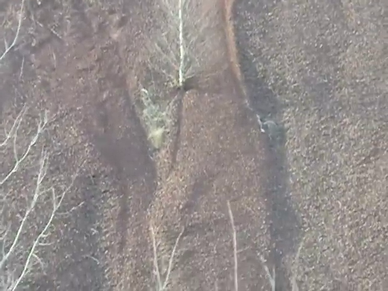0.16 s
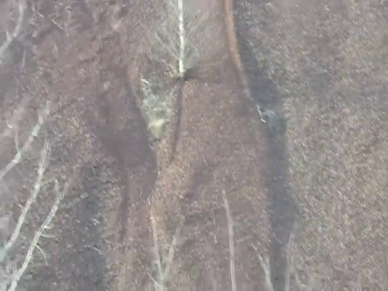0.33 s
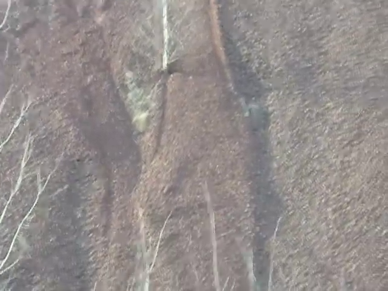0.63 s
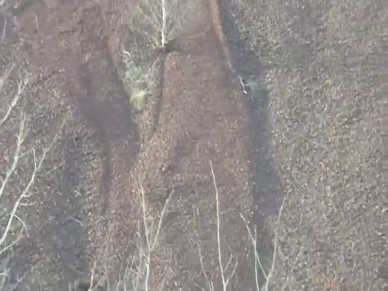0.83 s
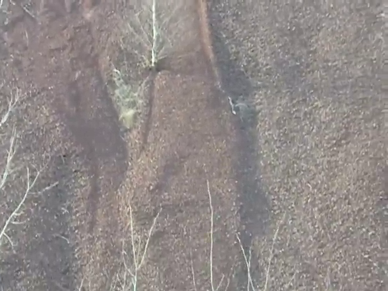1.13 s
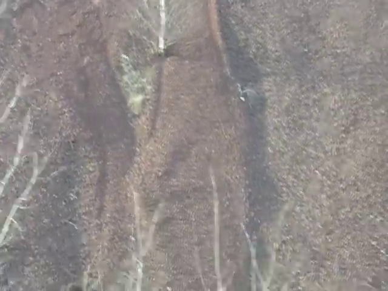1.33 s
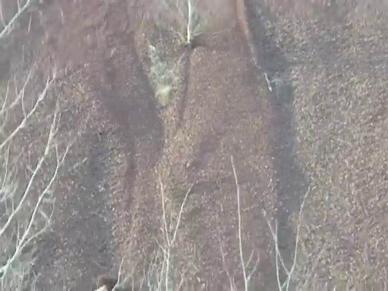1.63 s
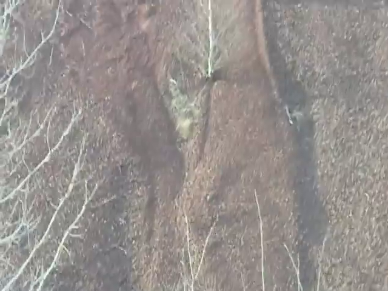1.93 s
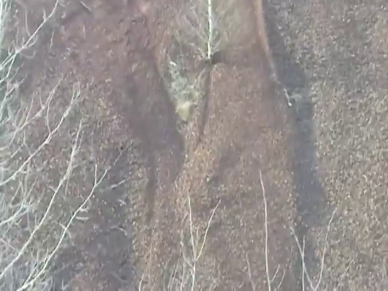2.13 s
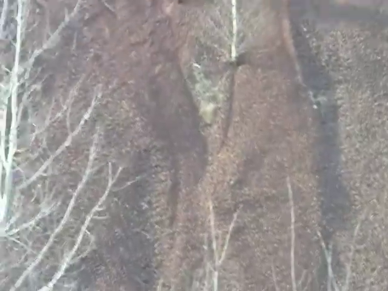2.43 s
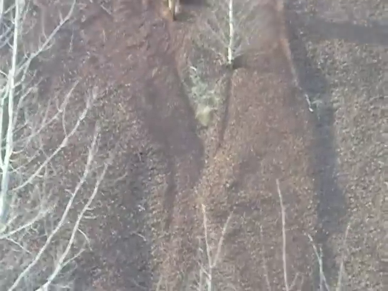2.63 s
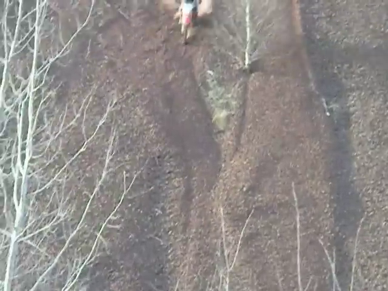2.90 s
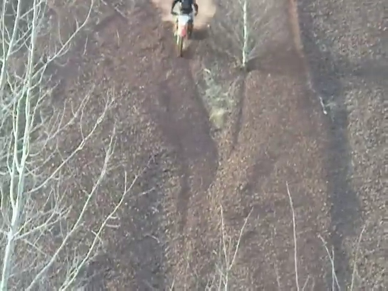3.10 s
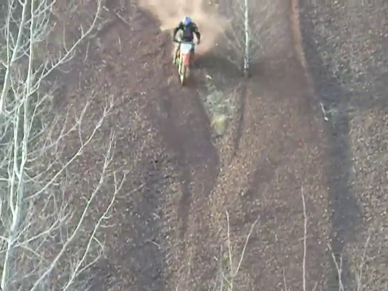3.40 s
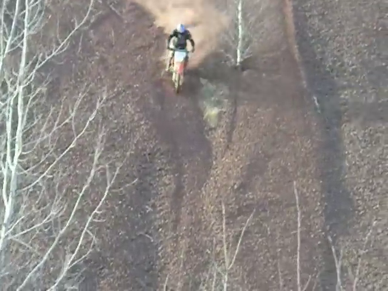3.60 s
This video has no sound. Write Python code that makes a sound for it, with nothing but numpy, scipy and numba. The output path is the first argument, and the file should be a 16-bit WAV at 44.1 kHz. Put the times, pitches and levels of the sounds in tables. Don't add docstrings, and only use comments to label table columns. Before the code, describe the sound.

A two-stroke dirt bike sputters down a wooded slope, nears, revs briefly, then drops to a rough idle.

```python
import sys
import numpy as np
from scipy import signal
from scipy.io import wavfile
from scipy.ndimage import uniform_filter1d
from numba import njit

SR = 44100
rng = np.random.default_rng(int(sys.argv[2]) if len(sys.argv) > 2 else 0)


def master_out(mix):
    frames = np.transpose(np.atleast_2d(mix))
    ceiling = np.clip(frames, -1, 1)
    pcm = np.round(ceiling * 32767).astype(np.int16)
    wavfile.write(sys.argv[1], SR, pcm)


def boost(x):
    u = np.asarray(x, float) / 20
    return 10 ** u


N = 165375

# time in seconds, level in dB, length in ms (negative = push, not suction).
WIND_THUMPS = [(0.502, 10.5, 3.5), (0.584, -18, -2), (0.591, 7, -1), (1.006, 2.5, 1.5), (1.103, -1.5, -4),
               (1.223, 5, 3.5), (1.344, -24, -1), (1.391, 2, 1.73), (1.521, -4, 2), (1.595, -0.5, 0),
               (1.797, -5.5, 5), (2.906, -8, 17), (3.151, 6.5, 1.5)]
# time in seconds, level in dB, length in ms (negative = push).
WIND_SLAPS = [
    (.8129, 6, .7),
    (.8137, 14, -.7),
    (.818, 10, 1.4),
    (.8192, 21, -.8),
    (.833, 14, 1.2),
]
# time in seconds, level in dB, length in ms (negative = push).
WIND_KNOCKS = [(.033, -5, 1.6), (.066, -3, -1.2), (.073, -2, -1.4), (.120, 0, 2.6), (.181, 1, 1.8),
               (.262, -3, 2), (.391, -3, -1.3), (.403, -2, -1), (.604, 0, 1.8)]
# time in seconds, level in dB.
GUSTS = [(0.0, -30.5), (0.48, -29), (0.51, -16), (0.55, -24), (0.58, -14.5), (0.62, -26.5), (2.02, -31),
         (2.69, -41), (2.87, -21), (3.08, -57), (3.14, -26), (3.24, -42.5), (3.65, -26.5), (3.75, -35.5)]
# time in seconds, peak in dB, crack over the pipe in dB.
FAR_BANGS = [(0.067, -13, -3.5), (0.298, -5, -5), (0.429, -0.5, -3), (0.652, 0.5, -5), (0.74, -5, -6),
             (0.752, -11, -17), (0.8115, -2.5, -31), (0.896, 3, -4), (0.952, -7.5, 4.5), (1.041, -1, -22),
             (1.095, -33, -5), (1.141, -0.5, -2.5), (1.203, -22, -14), (1.305, -16, -3), (1.353, -2, -2.5),
             (1.441, -10, 0.5), (1.561, -13, 2.5), (1.573, -0.5, -10), (1.63, -19, -3),
             (1.697, -18.5, 13.5), (1.73, -6, -5), (1.837, -4, -7.5), (1.952, -10, 0), (1.998, -0.5, -19),
             (2.022, -2.5, -4), (2.041, -10.5, 0)]
# time in seconds, peak in dB, crack over the pipe in dB.
NEAR_BANGS = [(2.155, -18, 2), (2.170, 5.5, 0), (2.186, -1.5, 1), (2.218, 8.5, 0), (2.231, -12, 15.5),
              (2.261, 11, -1), (2.275, 10.5, -1), (2.355, 7.5, 1.5), (2.409, 1, -4), (2.422, 9.5, 0),
              (2.461, 8, 2.5), (2.473, 7.5, 8.5), (2.522, 8, 2), (2.532, 5, 10), (2.592, -16.5, -3),
              (2.605, 10.5, 2), (2.616, 7, 7), (2.661, -12, 10.5), (2.729, -14.5, -2), (2.749, -14, 3),
              (2.760, -9, -9.5), (2.774, 10, 1.5), (2.918, 5.5, 3), (2.990, 3.5, 1), (3.008, 1.5, 1.5),
              (3.057, -8, 1.5)]
# time in seconds, peak in dB, crack over the pipe in dB.
IDLE_BANGS = [(3.102, 7.5, 3), (3.121, -9, 8), (3.203, 8, 3.5), (3.283, 6, -1.5), (3.33, 2.5, 1),
              (3.374, -0.5, -4), (3.399, -3, -17), (3.417, 3, -5), (3.441, -19, -8), (3.484, 3, -1.5),
              (3.523, -1.5, -1.5), (3.545, -1.5, -10.5), (3.585, 5.5, -0.5), (3.607, -5, -6),
              (3.629, -8.5, -4), (3.644, 7.5, -3), (3.664, 2, -0.5), (3.703, -8, -10), (3.723, -8.5, -7)]
# time in seconds, turns per second, puff in dB, rattle in dB.
CRANK = [(0, 42, -17.5, -31.5), (0.398, 50.5, -17, -27), (.8, 53, -42, -21), (1.201, 57, -28.5, -32),
         (1.499, 53, -37, -29), (1.901, 44.6, -42, -36.5), (2.05, 50, -19, -27), (2.18, 46, -31, -26),
         (2.251, 73, 0, -12.5), (2.407, 99, -29.5, -16), (2.5, 69, -24.5, -12), (2.642, 83, -13.5, -13),
         (2.801, 68, -8, -16), (2.898, 57, -7.5, -20), (3.029, 52, -13.5, -17.5), (3.298, 60, -15, -20),
         (3.75, 58, -15.5, -24)]
# time in seconds, level in dB.
STEADY_FIRING = [
    (2.05, -30),
    (2.25, -14),
    (2.6, -13),
    (2.8, -12),
    (2.95, -17),
    (3.75, -19),
]
# frequency in Hz, width in Hz, level in dB.
PUFF_MODES = [(385, 120, 0), (600, 170, -2), (850, 400, -7), (1100, 250, -8)]
# frequency in Hz, width in Hz, level in dB.
PIPE_MODES = [(361.8, 40.4, 11), (604, 110, -13), (790, 585, -10.5), (984, 67, -0.5), (1090, 65, -7),
              (1700, 90, -17.5), (2130, 69, -10)]
# frequency in Hz, width in Hz, level in dB.
CRACK_MODES = [(1572, 760, 4.5), (1778, 104, 11), (2288, 310, 0), (2825, 246, 0), (3592, 290, -9.5)]
# frequency in Hz, width in Hz, rms in dB.
TIN_FAR = [(403, 160, -15), (780, 370, -6), (1149, 220, -0.5), (1336, 55, -1.5), (1780, 160, -5),
           (2320, 360, -3.5), (3030, 130, -4), (3630, 230, -13.5)]
# frequency in Hz, width in Hz, rms in dB.
TIN_NEAR = [(619, 34, -9.5), (935, 100, -2.5), (1080, 100, -4.5), (1407, 260, -0.5), (1730, 270, -4),
            (2070, 110, -10), (2500, 460, -4.5), (3063, 420, -1.5), (3430, 650, -17)]
# frequency in Hz, width in Hz, rms in dB.
TIN_IDLE = [(372, 56, 1.5), (481, 180, -17), (933, 40, -5), (1081, 180, -6.5), (1428, 340, -7.5),
            (1660, 220, -6.5), (2135, 150, -2.5), (2540, 730, -7), (3057, 270, -4), (3460, 280, -15)]
# time in seconds, frequency in Hz, rms in dB.
PIPE_HUM = [(2.0, 375, -33), (2.102, 375, -26.5), (2.348, 385, -23.5), (2.548, 415, -28.5),
            (2.682, 400, -31), (2.76, 365, -14), (2.87, 415, -23.5), (3.0, 375, -27), (3.299, 362, -33.5),
            (3.75, 372, -28)]
# time in seconds, frequency in Hz, rms in dB.
CHAIN_WHINE = [
    (2.2, 585, -45),
    (2.249, 595, -15),
    (2.45, 616, -24),
    (2.62, 630, -31),
    (2.72, 594, -21),
    (2.8, 570, -28.5),
    (2.86, 540, -45),
]
# time in seconds, frequency in Hz, rms in dB.
GEAR_WHINE = [
    (2.9, 1086, -47),
    (3.05, 1080, -18),
    (3.301, 1049, -26),
    (3.498, 1056, -25),
    (3.75, 1105, -25.5),
]

IN_SIGHT_S, IDLE_S, TURN_S = 2.187, 2.95, 0.22
BUFFETS_PER_S, BUFFET_SCATTER_DB, BUFFET_HZ, BUFFET_WIDTH_HZ = 68, 7.5, 183.0, 193.0
BUFFET_DB, RUMBLE_DB, CALM_RUMBLE_DB = 6, 8.5, -29.5
TURN_JITTER, PUFF_SCATTER_DB, PUFF_CRACK_DB, BANG_DB = .008, 5, -8, 3
COOL_TURNS, HOT_TURNS, HOT_RISE = 66, 84, 1.1
PUSH_S, PIPE_LOW_HZ = .00015, 227
CRACK_S, CRACK_FAR_S, CRACK_LATE_S, CRACK_DB = .003, .005, .0015, -7.5
SHOCK_HZ, SHOCK_WIDTH_HZ, SHOCK_DB, SHOCK_FAR_DB = 1200, 1600, 1, -4
GATE_TURNS, GATE_FLOOR, PANEL_FLICKER_DB = 0.4, 0.92, 2
WHINE_WOBBLE, WHINE_FLICKER_DB = 0.00809, 4.5
WOOD_T60_S, WOOD_DB, WOOD_GAP_S = .12, -15, .005
AGC_TOP_DB, AGC_SLOPE, AGC_ATTACK_S, AGC_RELEASE_S, AGC_LAG_S = -15, 0.9, 0.00089, 0.035, .0004
OUT_DB, MIC_LOW_HZ, DROOP_HZ, TOP_HZ = 2.5, 162, 3900, 4400
PREAMP_TOP, CLIP, DC = .84, .7, -.0027


def level(x, db):
    return x * boost(db) / np.sqrt(np.mean(x ** 2))


@njit
def svf(x, hz, width):
    y, b, l = np.empty(len(x)), 0., 0.
    g, k = np.tan(np.pi * hz / SR), width / hz
    for i in range(len(x)):
        v = (b + g * (x[i] - l)) / (1 + g * (g + k))
        b, l, y[i] = 2 * v - b, l + 2 * g * v, k * v
    return y


def body(x, modes):
    def ring(v):
        return sum((-1) ** k * boost(db) * svf(v, 1. * hz, 1. * w) for k, (hz, w, db) in enumerate(modes))
    return ring(x + 1e-18) / np.abs(ring(signal.unit_impulse(999))).max()


def clicks(s, db):
    return np.bincount(np.clip((s * SR).astype(int), 0, N - 1), boost(db), N)


def walk(rate):
    k = int(SR / rate)
    held = np.repeat(rng.standard_normal(N // 20)[:N // k + 1], k)[:N]
    return 1.22 * uniform_filter1d(uniform_filter1d(held, k), k)


def ease_in(t, s):
    return 1 / (1 + np.exp(-4 * (t - s) / TURN_S))


def wind(t):
    thumps = np.zeros(N)
    for s, db, ms in WIND_THUMPS + WIND_SLAPS + WIND_KNOCKS:
        thumps -= np.sign(ms) * boost(db) * np.exp(-((t - s) * 2000 / ms) ** 2)
    hits = (rng.random(N) < BUFFETS_PER_S / SR) * np.sign(rng.standard_normal(N))
    hits = hits * boost(BUFFET_SCATTER_DB * np.minimum(rng.exponential(size=N), 3))
    buffets = svf(svf(hits, BUFFET_HZ, BUFFET_WIDTH_HZ), BUFFET_HZ, 2 * BUFFET_WIDTH_HZ)
    rumble = svf(rng.standard_normal(N), 43.0, 80.0) * boost(3.3 * walk(11))
    gust = boost(np.interp(t, *np.array(GUSTS).T))
    gusty = gust * (level(buffets, BUFFET_DB) + level(rumble, RUMBLE_DB))
    return thumps + gusty + level(rumble, CALM_RUMBLE_DB)


def crank_turns(t, speed, bang_s):
    turns = np.cumsum(speed) / SR
    at = np.interp(bang_s, t, turns)
    whole = at[0] + np.r_[0, np.cumsum(np.maximum(np.round(np.diff(at)), 1))]
    return turns + np.interp(t, bang_s, whole - at) - at[0] % 1


def weak_firing(t, turns):
    late, scatter = rng.standard_normal((2, 400))
    puff_s = np.interp(np.arange(400) + TURN_JITTER * late, turns, t, left=t[-1])
    crank_s, _, puff_db, _ = np.array(CRANK).T
    puffs = clicks(puff_s + CRACK_S, np.interp(puff_s, crank_s, puff_db) + PUFF_SCATTER_DB * scatter)
    steady_db = np.interp(puff_s, *np.array(STEADY_FIRING).T, left=-60)
    return puffs, clicks(puff_s + CRACK_S, steady_db + scatter)


def exhaust_pipe(weak, bangs, speed):
    hot = np.clip((speed - COOL_TURNS) / (HOT_TURNS - COOL_TURNS), 0, 1)
    raised = [(hz * HOT_RISE, w, db) for hz, w, db in PIPE_MODES]
    pipe = body(weak, PUFF_MODES) + body(bangs * (1 - hot), PIPE_MODES) + body(bangs * hot, raised)
    pipe = signal.lfilter([1], [1, -np.exp(-1 / (PUSH_S * SR))], pipe) / (PUSH_S * SR)
    return signal.sosfilt(signal.butter(2, PIPE_LOW_HZ, "high", fs=SR, output="sos"), pipe)


def gas_swell(x, s):
    k = np.arange(1500) / SR / s
    return signal.fftconvolve(x, (k * np.exp(1 - k)) ** 3)[:N]


def gas_crack(puffs, bang, near):
    bang_s, peak_db, crack_db = bang.T
    shots = boost(PUFF_CRACK_DB) * puffs + clicks(bang_s + CRACK_LATE_S, peak_db + crack_db + BANG_DB)
    gas = near * gas_swell(shots, CRACK_S) + (1 - near) * gas_swell(shots, CRACK_FAR_S)
    hiss = level(body(rng.standard_normal(N), CRACK_MODES), CRACK_DB)
    front = clicks(bang_s + CRACK_S, peak_db + SHOCK_DB) * (near + (1 - near) * boost(SHOCK_FAR_DB))
    return gas * hiss - body(front, [(SHOCK_HZ, SHOCK_WIDTH_HZ, 0)])


def wood(x):
    s = np.arange(8000) / SR
    tail = rng.standard_normal(8000) * boost(-60 * s / WOOD_T60_S) * (s > WOOD_GAP_S)
    return x + signal.fftconvolve(x, tail / np.sqrt(np.sum(tail ** 2)))[:N] * boost(WOOD_DB)


def panels(modes):
    total = np.zeros(N)
    for hz, w, db in modes:
        shaken = svf(svf(rng.standard_normal(N), 1. * hz, 1. * w), 1. * hz, 5.1 * w)
        total += level(shaken, db) * boost(PANEL_FLICKER_DB * walk(29.904))
    return total


def tin_rattle(t, turns, near):
    idle = ease_in(t, IDLE_S)
    tin = (1 - near) * panels(TIN_FAR) + (near - idle) * panels(TIN_NEAR) + idle * panels(TIN_IDLE)
    jolt = GATE_FLOOR + np.exp(-(turns % 1) / GATE_TURNS)
    crank_s, _, _, rattle_db = np.array(CRANK).T
    return tin * jolt * boost(np.interp(t, crank_s, rattle_db))


def whine(t, rows):
    s, hz, db = np.array(rows).T
    phase = 2 * np.pi * np.cumsum(np.interp(t, s, hz) * (1 + WHINE_WOBBLE * walk(40))) / SR
    loudness = np.interp(t, s, db, left=-90, right=-90) + WHINE_FLICKER_DB * walk(25)
    return np.sqrt(2) * np.sin(phase) * boost(loudness)


def bike(t):
    bang = np.vstack([FAR_BANGS, NEAR_BANGS, IDLE_BANGS])
    crank_s, crank_speed, _, _ = np.array(CRANK).T
    speed = np.interp(t, crank_s, crank_speed)
    turns = crank_turns(t, speed, bang[:, 0])
    near = ease_in(t, IN_SIGHT_S)
    puffs, steady = weak_firing(t, turns)
    bangs = clicks(bang[:, 0] + CRACK_S, bang[:, 1] + BANG_DB)
    firing = gas_crack(puffs, bang, near) - exhaust_pipe(puffs + steady, bangs, speed)
    tones = whine(t, PIPE_HUM) + whine(t, CHAIN_WHINE) + whine(t, GEAR_WHINE)
    return wood(firing) + tin_rattle(t, turns, near) + tones


def scene():
    t = np.arange(N) / SR
    return (wind(t) + bike(t))[None]


@njit
def follow(x, up, down):
    y, e = np.empty(len(x)), .05
    for i in range(len(x)):
        e += (abs(x[i]) - e) * (up if abs(x[i]) > e else down)
        y[i] = e
    return y


def top_cut(x):
    return signal.sosfilt(signal.butter(12, 15900, fs=SR, output="sos"), x)


def record(dry):
    env = follow(dry[0], 1 / (AGC_ATTACK_S * SR), 1 / (AGC_RELEASE_S * SR))
    env = np.roll(env, int(AGC_LAG_S * SR))
    x = dry * np.minimum(boost(AGC_TOP_DB) / env, 1) ** AGC_SLOPE * boost(OUT_DB)
    x = signal.sosfilt(signal.butter(3, MIC_LOW_HZ, "high", fs=SR, output="sos"), x)
    x = x / (1 + (x / PREAMP_TOP) ** 4) ** .25
    x = signal.sosfilt(signal.butter(10, DROOP_HZ, fs=SR, output="sos"), x)
    x = signal.sosfilt(signal.ellip(10, 1, 90, TOP_HZ, fs=SR, output="sos"), x)
    return top_cut(np.clip(x + DC, -CLIP, CLIP))


dry = scene()
out = record(dry)
master_out(out)
```